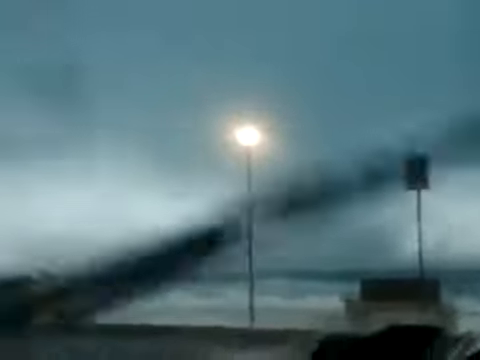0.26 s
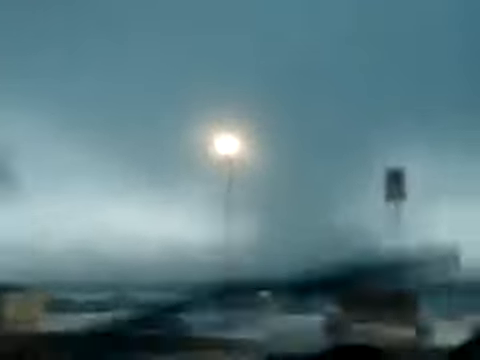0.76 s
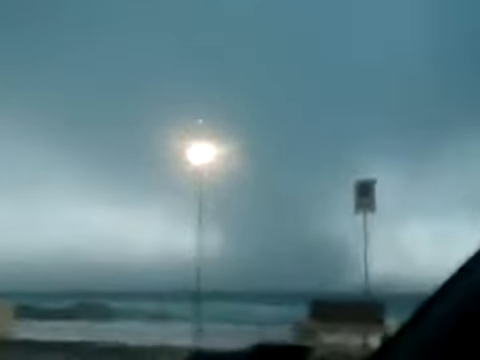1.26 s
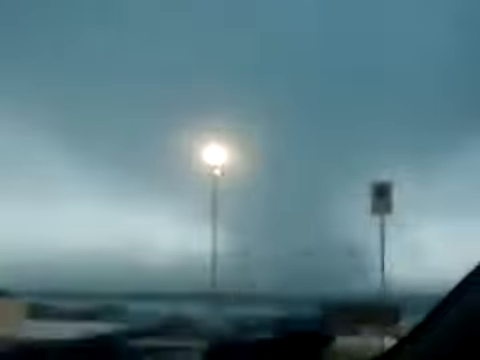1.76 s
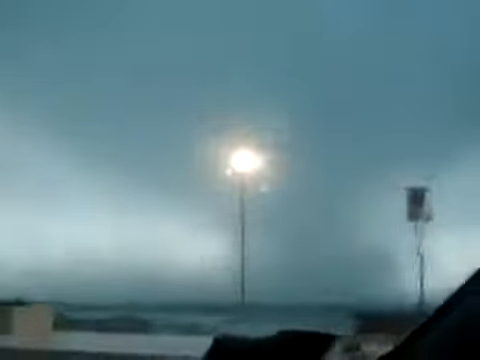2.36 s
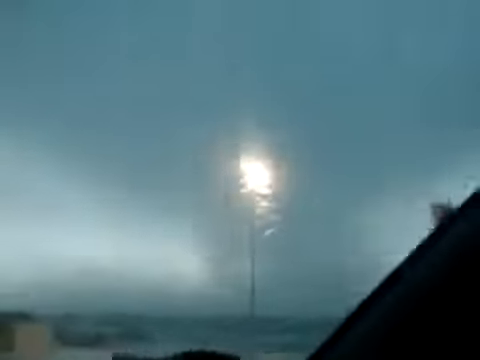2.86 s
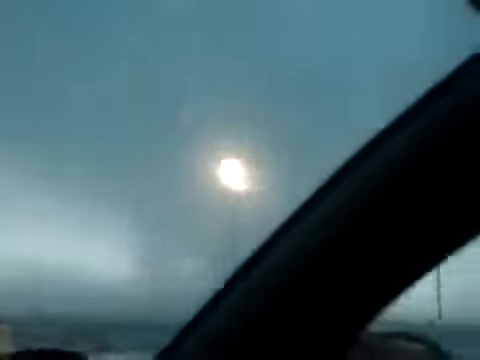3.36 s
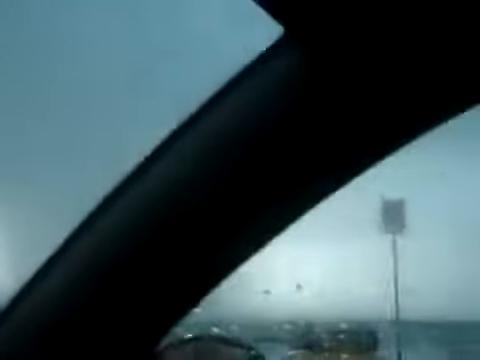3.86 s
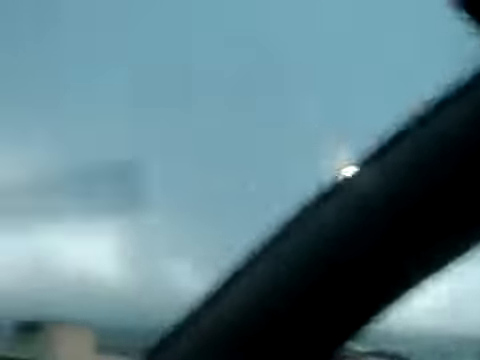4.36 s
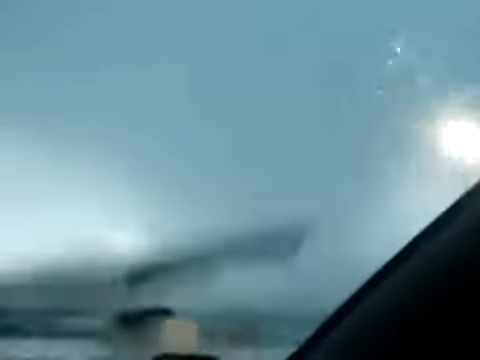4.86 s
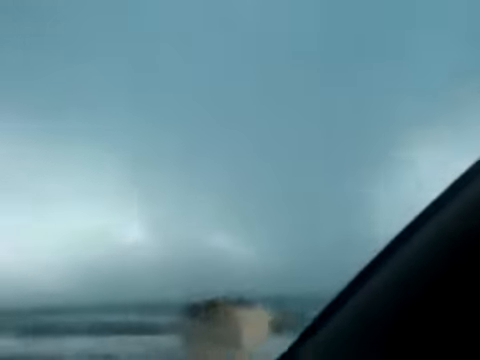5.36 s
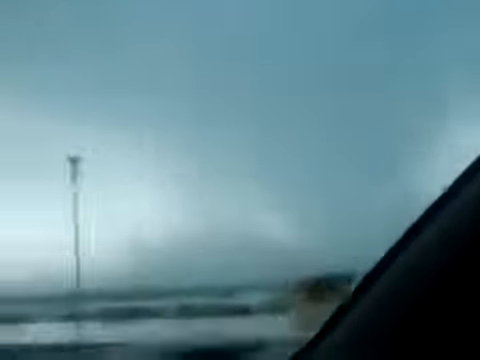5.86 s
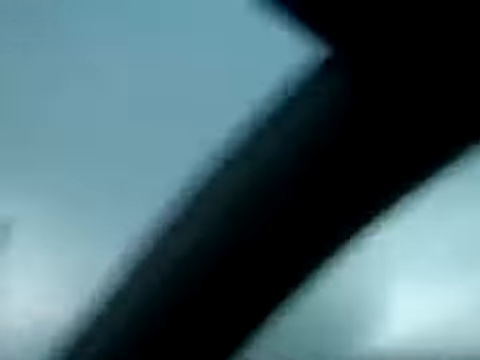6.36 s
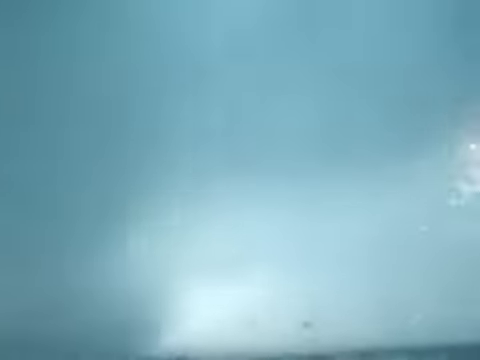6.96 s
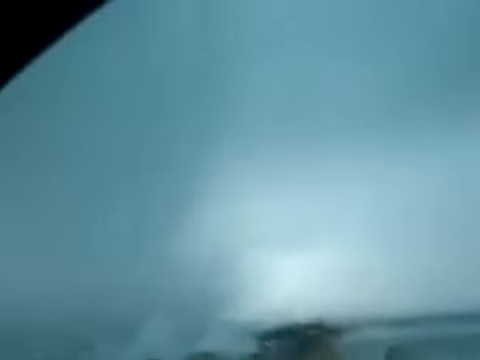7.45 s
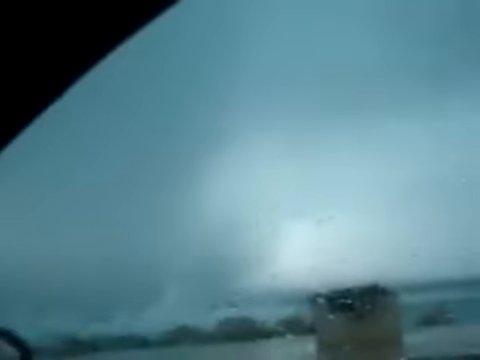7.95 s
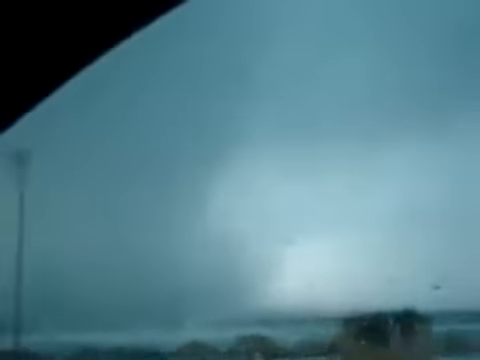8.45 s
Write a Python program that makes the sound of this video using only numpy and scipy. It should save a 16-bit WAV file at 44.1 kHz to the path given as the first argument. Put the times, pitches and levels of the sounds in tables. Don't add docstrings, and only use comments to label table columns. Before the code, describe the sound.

Inside a parked car by a stormy shore, dense rain drums steadily on the roof with a boxy low-mid boom. Fat drops crack and pat on the glass, and wipers thud softly at each reversal. Around five to six and a half seconds, strong gusts hurl louder sheets of spray at the windows, then it eases. A low engine and hum sit underneath. Small handheld camera, close, treble cut off.

```python
import sys
import numpy as np
from scipy import signal
from scipy.fft import rfft, irfft, next_fast_len
from scipy.io import wavfile
from scipy.ndimage import uniform_filter1d

SR = 44100
rng = np.random.default_rng(int(sys.argv[2]) if len(sys.argv) > 2 else 0)


def int16_out(signal):
    q = np.round(np.clip(np.atleast_2d(signal).T, -1, 1) * 32767)
    wavfile.write(sys.argv[1], SR, q.astype(np.int16))


def linear_from_db(decibels):
    return 10 ** (np.asarray(decibels, float) / 20)


N = 383669


def unit(x):
    return x / np.sqrt(np.mean(x ** 2))


def band(x, lo_hz, hi_hz):
    return signal.sosfilt(signal.butter(2, [lo_hz, hi_hz], "band", fs=SR, output="sos"), x)


def between(x, lo_hz, hi_hz, edge_hz=60):
    size = next_fast_len(len(x))
    hz = np.fft.rfftfreq(size, 1 / SR)
    rise = np.clip((hz - lo_hz) / edge_hz + 0.5, 0, 1)
    fall = np.clip((hi_hz - hz) / edge_hz + 0.5, 0, 1)
    return irfft(rfft(x, size) * rise * fall, size)[:len(x)]


def colour(x, table, modes=()):
    size = 2 ** 13
    hz = np.maximum(np.fft.rfftfreq(size, 1 / SR), 1)
    outline_hz, outline_db = np.transpose(table)
    db = np.interp(np.log(hz), np.log(outline_hz), outline_db)
    for f, width, lift_db in modes:
        db = db + lift_db / (1 + (2 * (hz - f) / width) ** 2)
    ceps = irfft(np.log(linear_from_db(db)))
    ceps[1:size // 2] *= 2
    ceps[size // 2 + 1:] = 0
    response = irfft(np.exp(rfft(ceps)))
    return signal.fftconvolve(x, response / np.sqrt(np.sum(response ** 2)))[:N]


def fade(x, t60):
    return signal.lfilter([1], [1, -np.exp(-np.log(1000) / (t60 * SR))], x)


def walk(rate):
    hold = int(SR / rate)
    levels = np.repeat(rng.standard_normal(N // hold + 1), hold)
    return uniform_filter1d(levels, hold)[:N]


def read(table):
    s, *columns = np.transpose(table)
    return [np.interp(np.arange(N) / SR, s, column) for column in columns]


def patter(rate, spread_db, t60, cap_db=12):
    when, size, noise = rng.random(N), rng.exponential(size=N), rng.standard_normal(N)
    power = (when < rate / SR) * linear_from_db(2 * np.minimum(spread_db * size, cap_db))
    return unit(noise * np.sqrt(fade(power, t60 / 2)))


def ticks(rate, spread_db):
    when, size, sign = rng.random(N), rng.exponential(size=N), np.sign(rng.standard_normal(N))
    return unit((when < rate / SR) * sign * linear_from_db(np.minimum(spread_db * size, 15)))


def mic_hiss():
    return linear_from_db(-57.5 + 1.5 * walk(3)) * unit(band(rng.standard_normal(N), 3500, 9000))


def buffet():
    return linear_from_db(-55 + 2.5 * walk(4)) * unit(band(rng.standard_normal(N), 20, 45))


# time in seconds, firing rate in Hz, level in dB.
ENGINE = [(0, 29.6, -60), (1.24, 29.5, -60), (1.5, 33, -64), (2.1, 29.5, -57), (2.83, 32.5, -56),
          (3.5, 30.5, -57), (4.2, 36.5, -56), (4.7, 41, -52), (4.99, 44, -46), (5.19, 46.5, -58),
          (5.47, 48.5, -59), (5.8, 46, -60), (6.06, 41, -53), (6.3, 36, -63), (6.83, 29.4, -61),
          (8.7, 29.4, -58)]


def engine():
    firing_hz, level_db = read(ENGINE)
    phase = 2 * np.pi * np.cumsum(firing_hz) / SR
    firing = linear_from_db(level_db) * (np.sin(phase) + linear_from_db(0.5) * np.sin(2 * phase))
    hum_hz, hum_db = 59.9, -47
    hum = linear_from_db(hum_db) * np.sin(2 * np.pi * hum_hz * np.arange(N) / SR)
    return np.sqrt(2) * (firing + hum)


# time in seconds, peak level in dB.
WIPER = [(0.044, -18), (0.769, -26), (1.4, -13.5), (2.1, -17), (2.809, -21), (4.112, -16), (4.769, -19),
         (5.488, -15.5), (6.16, -17), (6.867, -19.5), (8.212, -11)]
# frequency in Hz, width in Hz, level in dB.
PANEL_MODES = [(160, 25, -4), (330, 50, -3), (420, 50, -1), (560, 60, -1), (730, 70, 0), (900, 90, 1)]


def wiper():
    blows = np.zeros(N)
    for s, db in WIPER:
        blows[int(s * SR)] += linear_from_db(db + 2)
        blows[int((s + 0.013) * SR)] -= linear_from_db(db - 2)
    t = np.arange(4096) / SR
    ring = np.zeros(len(t))
    for f, width, db in PANEL_MODES:
        ring += linear_from_db(db) * np.exp(-np.pi * width * t) * np.sin(2 * np.pi * f * t)
    soft_ring = ring * (1 - np.exp(-t / 0.003))
    return between(signal.fftconvolve(blows, soft_ring)[:N], 120, 1500)


LULL_SPRAY_DB = -41.5
# peak time in seconds, spray in dB, rise in seconds, fall in seconds.
GUSTS = [(.05, -38, 0.14, 0.073), (.8, -41.5, 0.23, 0.29), (2.5, -36, .2, 0.21), (3.3, -37, 0.056, 0.15),
         (3.55, -38.5, 0.043, 0.17), (3.82, -36, 0.076, 0.094), (4.03, -34, 0.061, 0.097),
         (4.62, -35, 0.23, 0.16), (4.86, -26, 0.07, .12), (5.46, -26, 0.15, 0.2), (6.0, -27, 0.098, .15),
         (6.4, -29, 0.13, 0.24), (6.72, -32.5, 0.12, 0.18), (7.08, -37, 0.084, 0.16),
         (7.55, -37.5, 0.028, 0.13), (1.25, -37.5, .06, 0.05), (7.72, -37, 0.15, 0.2),
         (7.98, -34.5, 0.11, .2)]


def gusts():
    t = np.arange(N) / SR
    power = linear_from_db(2 * LULL_SPRAY_DB)
    for s, db, rise, fall in GUSTS:
        distance = np.abs((t - s) / np.where(t < s, rise, fall))
        power = power + linear_from_db(2 * db) * np.exp(-distance ** 2.09)
    return 10 * np.log10(power)


# frequency in Hz, density in dB per Hz.
GLASS = [(300, -25), (1000, 0), (2000, -2.5), (3000, -3), (4200, -5), (5500, -9), (7000, -13), (9000, -22),
         (11000, -27.5)]


def spray(spray_db):
    mist = patter(1900, 2.0, 0.02) * linear_from_db(1.8 * walk(30))
    dull = band(patter(90, 4.2, 0.04), 1800, 4400)
    wide = patter(73, 1.4, 0.026)
    crisp = band(ticks(260, 4.5), 2200, 8000)
    wet = mist + linear_from_db(-3.5) * dull + linear_from_db(-9.5) * wide + linear_from_db(-3) * crisp
    return linear_from_db(spray_db + 2.5) * unit(colour(wet, GLASS))


# time in seconds, peak in dB, brightness in dB, splash t60 in seconds.
CRACKS = [(0.0255, -12, -17, 0.09), (0.0702, -13.5, -21, 0.041), (0.152, -20, -19, 0.06),
          (0.2374, -22, -8, 0.041), (0.248, -11.5, -16.5, 0.046), (0.6997, -12, -20, 0.042),
          (0.7537, -13.5, -20.5, 0.073), (0.9243, -21, -13, 0.06), (0.9517, -17, -18, 0.06),
          (1.2455, -15, -20, 0.1), (1.4184, -16, -15, 0.047), (1.7598, -18.5, -17.5, 0.099),
          (2.7033, -24.5, -5, 0.082), (3.4974, -22, -14, 0.06), (3.5478, -21, -14, 0.049),
          (4.5296, -17.5, -22, 0.051), (4.6292, -16, -17, 0.067), (4.6732, -12.5, -19, 0.076),
          (4.9736, -12.5, -28, 0.084), (5.1917, -17, -17, 0.046), (5.2629, -10, -19, 0.074),
          (5.2999, -13.5, -11, 0.055), (5.6148, -13, -18, 0.11), (5.915, -10.5, -28, 0.056),
          (5.9497, -17, -11, 0.1), (6.0023, -6, -19.5, 0.044), (6.268, -8, -21, 0.051),
          (6.7362, -17, -13, 0.072), (7.5116, -12, -19, 0.082), (7.7506, -12, -16, 0.06)]
# time in seconds, peak in dB.
PATS = [(0.5307, -21), (0.576, -18.5), (0.853, -19), (1.0984, -17.5), (1.1632, -19), (1.282, -18.5),
        (1.7903, -17.5), (1.8195, -19.5), (2.173, -21), (2.3466, -22), (2.6155, -18), (2.8414, -20),
        (2.9505, -21.5), (3.32, -19), (3.4101, -19.5), (3.759, -16), (3.8037, -19.5), (3.9215, -16),
        (4.2023, -21), (4.4473, -11.5), (4.575, -22), (4.81, -11), (5.1383, -17), (5.4964, -9.5),
        (5.7104, -22), (6.2068, -19), (6.3106, -14), (6.6023, -10.5), (7.0534, -16.5), (7.097, -16)]


def all_drops(spray_db):
    strays_per_s = 30
    place, size = rng.random((int(strays_per_s * N / SR), 2)).T
    stray_s = (np.arange(len(place)) + place) / strays_per_s
    stray_db = spray_db[(stray_s * SR).astype(int)] + 12 + 4.5 * (2 * size - 1)
    pats = [(s, db, -28, 0.07) for s, db in PATS]
    strays = [(s, db, -19, 0.035) for s, db in zip(stray_s, stray_db)]
    return list(CRACKS) + pats + strays


def fat_drops(drops):
    t = np.arange(4096) / SR
    noise = rng.standard_normal((len(drops), 3, len(t)))
    low, high = np.zeros(N + len(t)), np.zeros(N + len(t))
    for (s, db, bright_db, t60), (low_noise, high_noise, ragged) in zip(drops, noise):
        hold = np.exp(-(t / max(t60 / 8, 1e-3)) ** 1.4)
        tail = linear_from_db(-10 - 60 * t / 0.2)
        attack = np.minimum(t / 0.0007, 1)
        shape = linear_from_db(db - 12) * attack * (hold + tail) * linear_from_db(5.3 * ragged)
        i = int(s * SR)
        low[i:i + len(t)] += shape * low_noise
        high[i:i + len(t)] += shape * high_noise * linear_from_db(bright_db + 15.5)
        low[i + 20] -= linear_from_db(db + 9)
        high[i + 20] -= linear_from_db(db + bright_db + 27)
    splashes = band(low[:N], 2200, 6600) + linear_from_db(5.5) * band(high[:N], 7000, 16000)
    return colour(splashes, GLASS)


# time in seconds, drumming in dB.
DOWNPOUR = [(0, -24.5), (.2, -25.5), (2.6, -25), (3.1, -26.5), (4.5, -26), (5.0, -23.5), (5.2, -25),
            (5.5, -22), (5.75, -24.5), (6.5, -24), (7.0, -27), (8.2, -26), (8.7, -26)]
# time in seconds, boom over drumming in dB.
SWING = [
    (0, -3),
    (2.6, -3.5),
    (3.75, -3),
    (3.9, -11.5),
    (4.1, -11.5),
    (4.25, -3.5),
    (6.1, -5.5),
    (6.5, -8.5),
    (8.7, -7.5),
]


def downpour(spray_db):
    lift = spray_db - LULL_SPRAY_DB
    drum_db = read(DOWNPOUR)[0] + 0.066 * lift + 0.55 * walk(12)
    rattle_db = -7 + 0.16 * lift + 1.46 * walk(9)
    boom_db = read(SWING)[0] - 0.061 * lift + 1.4 * walk(6.4)
    return drum_db, rattle_db, boom_db


# frequency in Hz, density in dB per Hz.
ROOF = [(20, -35), (45, -26.5), (75, -21.5), (100, -15.5), (200, -9.5), (300, -9.5), (650, -4), (900, -8.5),
        (1500, -14.5), (1700, -20), (2600, -28.5), (4000, -43)]
# frequency in Hz, width in Hz, lift in dB.
CABIN = [(103, 12.5, 5), (150, 20, 2.5), (256.4, 89, 11), (357, 19, 6), (419.2, 26, 7), (553, 19.5, 5.5),
         (747, 12.7, 7), (807, 21, 5.5), (1110, 34, 1.5)]


def roof(drum_db, rattle_db, boom_db):
    body = unit(colour(patter(3000, 2.1, 0.036), ROOF, CABIN))
    upper = between(body, 826, 1900)
    boom = between(body, 130, 295)
    rumble = between(body, 5, 130, edge_hz=20)
    drumming = body - rumble + (linear_from_db(rattle_db + 6.5) - 1) * upper + (linear_from_db(boom_db + 4) - 1) * boom
    return linear_from_db(drum_db + 2.0) * drumming + linear_from_db(-23.0) * rumble


def scene():
    spray_db = gusts()
    background = mic_hiss() + buffet() + engine() + wiper()
    glass = spray(spray_db) + fat_drops(all_drops(spray_db))
    return (background + glass + roof(*downpour(spray_db)))[None]


TREBLE_EDGES_HZ = [4900, 5600, 6400, 7600, 8900, 10300]
# start in seconds, low edge in Hz, high edge in Hz.
DROPOUTS = [(.21, 5300, 10000), (.255, 4650, 8200), (.676, 5000, 10300), (.868, 3450, 7700),
            (1.07, 3760, 7700), (2.683, 4500, 10100), (4.424, 3000, 6600), (5.02, 3300, 5700),
            (5.168, 5300, 8800), (7.724, 5000, 10000), (8.012, 4950, 7600)]


def starved(x):
    block = 512
    luck = rng.random((len(TREBLE_EDGES_HZ), N // block + 1))
    out, top, spray_db = x.copy(), between(x, 4600, 11000, edge_hz=670), gusts()
    for lo_hz, hi_hz, chance in zip(TREBLE_EDGES_HZ[:-1], TREBLE_EDGES_HZ[1:], luck):
        thinned = np.repeat(chance < 0.12, block)[:N].astype(float)
        out -= 0.66 * uniform_filter1d(thinned, size=160) * between(x, lo_hz, hi_hz, edge_hz=400)
    placed = list(CRACKS) + list(PATS)
    for (s, db, *_), share in zip(placed, rng.random(len(placed))):
        i = int(s * SR)
        gap_s = (0.18 + 0.77 * share) * 0.018
        part = slice(max(i - int(gap_s * SR), 0), i)
        depth = np.clip((db - spray_db[i] - 20) / 7, 0, 0.88)
        out[part] -= depth * signal.windows.tukey(part.stop - part.start, 0.3) * top[part]
    dropout_s, dropout_db = 0.023, -12
    for s, lo_hz, hi_hz in DROPOUTS:
        part = slice(int(s * SR) - block, int((s + dropout_s) * SR) + block)
        gate = np.pad(signal.windows.tukey(part.stop - part.start - 2 * block, 0.2), block)
        out[part] -= gate * (1 - linear_from_db(dropout_db)) * between(out[part], lo_hz, hi_hz, edge_hz=340)
    return out


def top_cut(x):
    return signal.sosfilt(signal.butter(12, 11000, fs=SR, output="sos"), x)


def record(dry):
    x = starved(dry[0])
    top_hz = 10060
    main = between(x, 5, top_hz, edge_hz=200)
    residue = linear_from_db(-46) * between(x, top_hz, 11000, edge_hz=300)
    mix = (main + residue)[None]
    return top_cut(mix)


dry = scene()
out = record(dry)
int16_out(out)
```